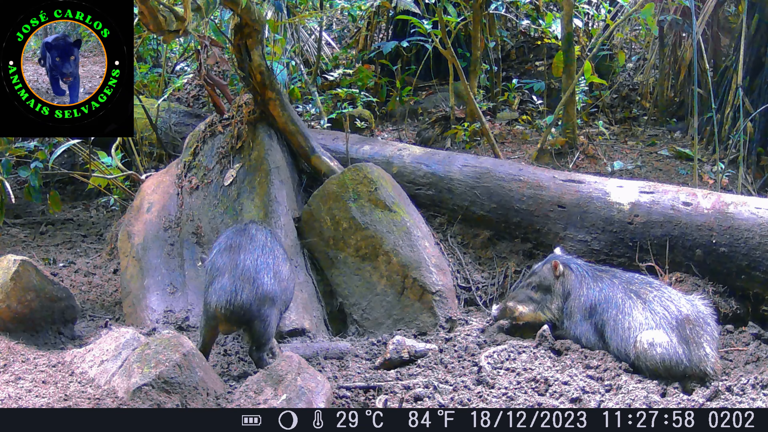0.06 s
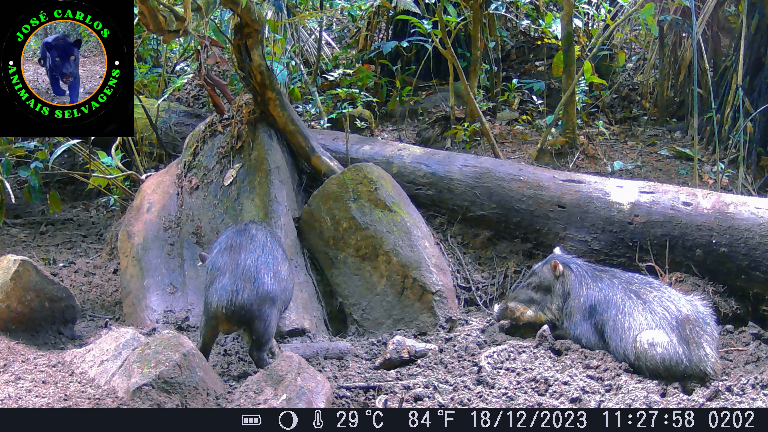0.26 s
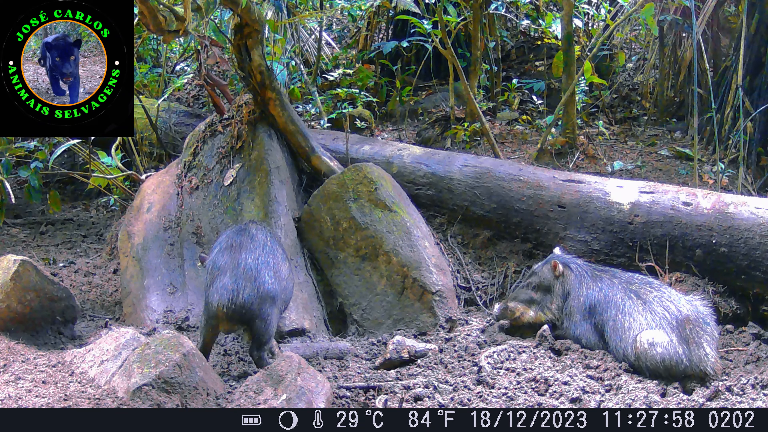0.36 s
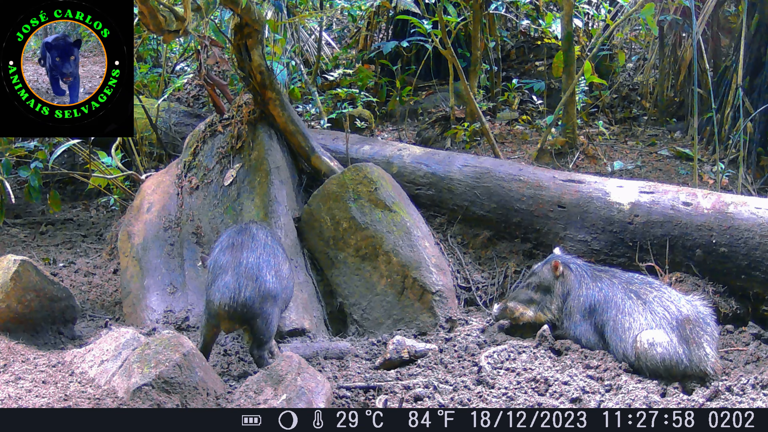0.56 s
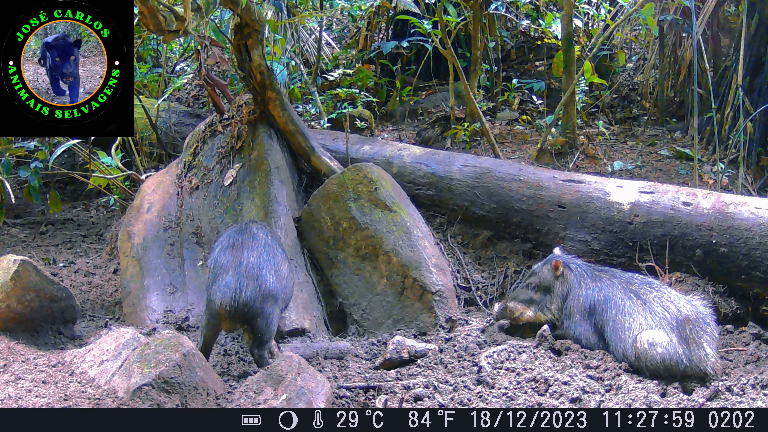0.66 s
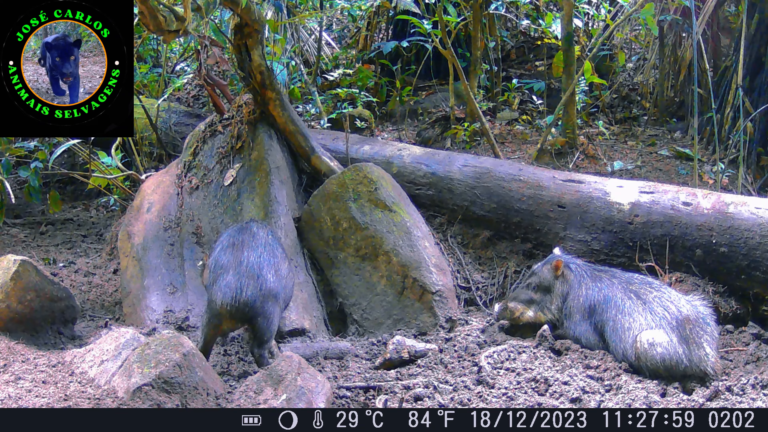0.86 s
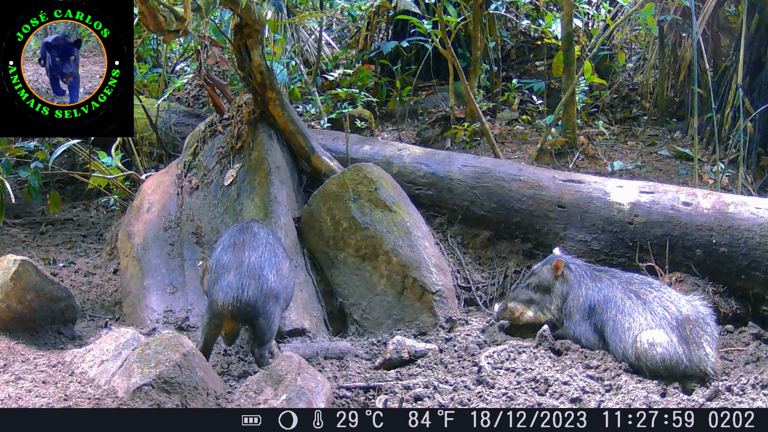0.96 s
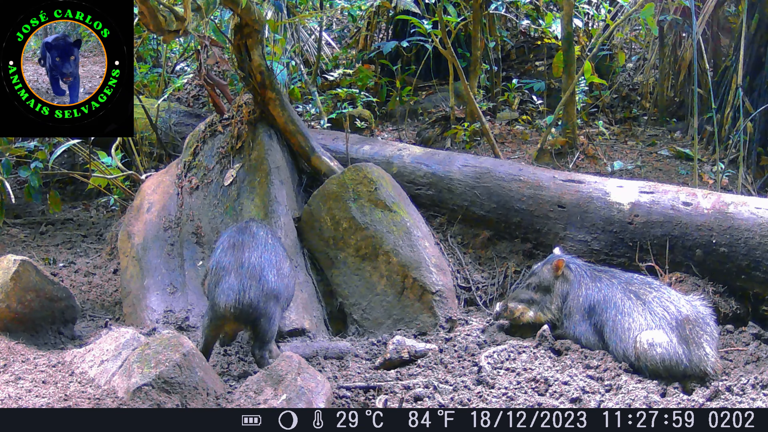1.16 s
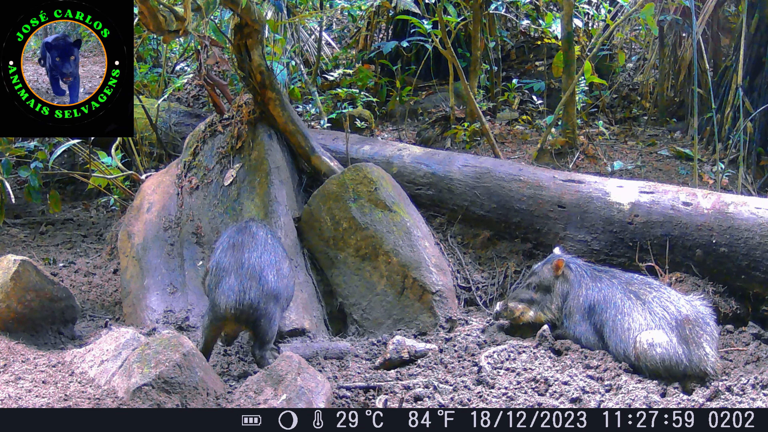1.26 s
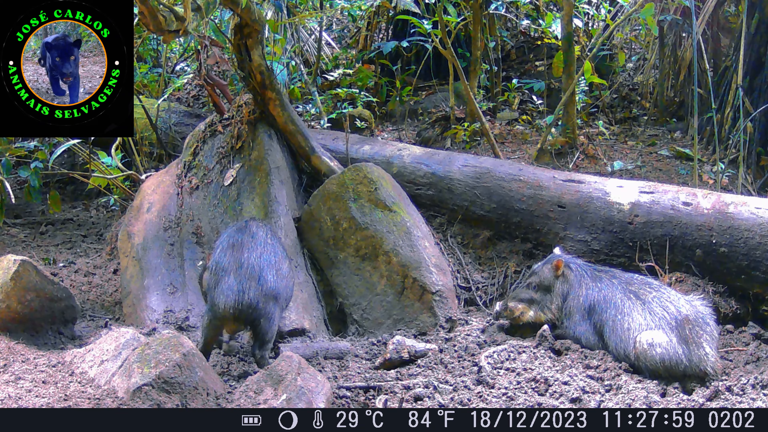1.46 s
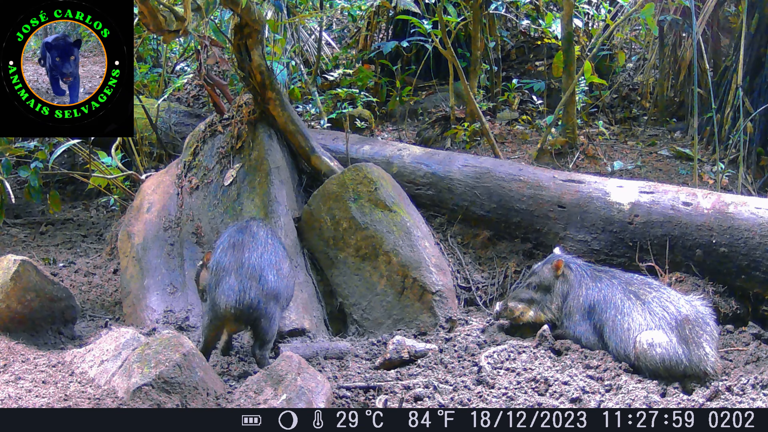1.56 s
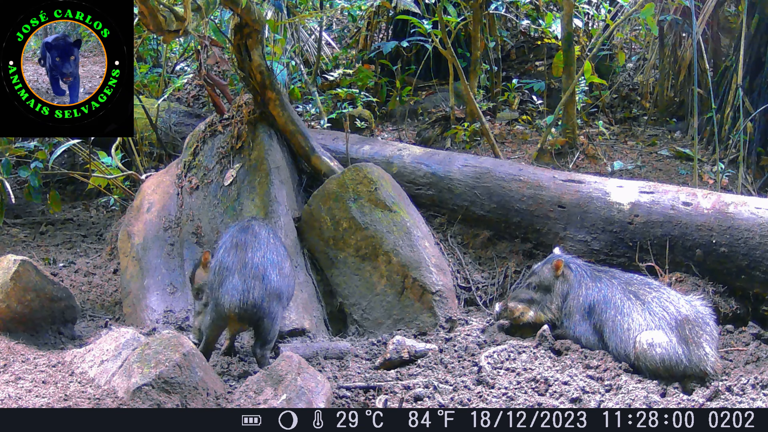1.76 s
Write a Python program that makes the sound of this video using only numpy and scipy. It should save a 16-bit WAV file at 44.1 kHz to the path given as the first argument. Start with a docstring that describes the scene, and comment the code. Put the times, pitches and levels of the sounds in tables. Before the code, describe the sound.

In a quiet forest, a wild pig snaps its teeth with a sharp, hollow double clack that echoes briefly. Afterwards hooves thud softly in soil and chewing ticks lightly, while distant birds whistle and chirp faintly.

```python
"""A forest murmurs, insects hiss and a bright wash of noise dies away. A bird repeats a falling whistle
and hooves thud softly. A peccary (a wild, pig-like animal) at a salt lick clacks its teeth twice:
the teeth crack, the jaw rings, the hollow mouth sounds, and rocks and trees throw the clacks back.
Then a fainter bird chirps above the whistle, and chewing and grit make small ticks."""
import sys
import numpy as np
from scipy import signal
from scipy.fft import rfft, irfft
from scipy.io import wavfile
from scipy.ndimage import uniform_filter1d

SR = 44100
rng = np.random.default_rng(int(sys.argv[2]) if len(sys.argv) > 2 else 0)


def waveform_to_disk(signal):
    """Save audio, clipped to [-1, 1], as 16-bit WAV at the path in sys.argv[1]."""
    frames = np.transpose(np.atleast_2d(signal))
    scaled = np.clip(frames, -1, 1) * 32767
    samples = np.round(scaled).astype(np.int16)
    wavfile.write(sys.argv[1], SR, samples)


N = 79380
T = np.arange(N) / SR
HZ = np.fft.rfftfreq(N, 1 / SR)


def amp(db):
    """Turns decibels into a number to multiply by."""
    return 10 ** (np.asarray(db) / 20)


def unit(x):
    """Scales a signal to an average strength (rms) of 1."""
    return x / np.sqrt(np.mean(x ** 2) + 1e-20)


def read(points, hz):
    """Looks up hz in rows of (frequency, value), sliding between rows on a pitch scale."""
    f, value = np.transpose(points)
    return np.interp(np.log(hz + 1), np.log(f + 1), value)


def add(mix, s, sound):
    """Mixes a sound in, starting at s seconds."""
    part = mix[max(round(s * SR), 0):]
    part += sound[:len(part)]


def tone(hz):
    """A steady, pure note."""
    return np.sin(2 * np.pi * hz * T)


def noise(gain):
    """Noise of strength 1; gain sets the share of each frequency."""
    return unit(irfft(rfft(rng.standard_normal(N)) * gain, N))


def band(hz, octaves):
    """A bell-shaped gain that keeps the frequencies near hz."""
    return np.exp(-.5 * (np.log2((HZ + 1) / hz) / octaves) ** 2)


def drift(hz):
    """A random wobble, up to about hz times a second."""
    return noise(np.exp(-(HZ / hz) ** 2))


def decay(t60, t=T):
    """A fade that drops 60 dB in t60 seconds, the fade time."""
    return np.exp(-np.log(1000) * t / t60)


def forest(x):
    """Countless tiny echoes of x: quick ones off the ground, lasting ones off the trunks."""
    # echoes among the trees: f/Hz, level/dB, fade time/s
    trees = [(150, -19, 0.75), (510, 17, 0.26), (1055, -5, 1), (1670, 5, 0.6), (2390, 1, 0.73),
             (3260, 2.5, 0.64), (4800, -1.5, 0.55), (7400, 6.5, 0.23)]
    trees = np.array(trees)
    hz, t, grains = signal.stft(rng.standard_normal(N), SR, nperseg=256)
    trunk_fade = decay(read(trees[:, [0, 2]], hz)[:, None], t)
    ground_fade = amp(-2) * decay(t60=0.18, t=t)
    colour = amp(read(trees[:, :2], hz))[:, None]
    tail = signal.istft(grains * colour * (trunk_fade + ground_fade), SR, nperseg=256)[1][:N]
    tail *= np.minimum(T / 0.013, 1)  # the echoes take a moment to build
    return signal.fftconvolve(x, tail / np.linalg.norm(tail))[:N]


def murmur():
    """The forest's low noise, slightly louder or softer in random patches of pitch and time."""
    # tone colour of the murmur: f/Hz, relative level/dB
    colour = [(25, 5.5), (60, 3.5), (100, 0.5), (160, -3.5), (280, -6), (500, -8.5), (750, -13),
              (1400, -14.5), (1900, -16.5), (2500, -22), (3300, -26), (4300, -32.5), (5150, -40),
              (5800, -27), (6400, -31.5), (7200, -26.5), (8300, -27), (9100, -51.5)]
    rumble_cut = HZ / np.hypot(HZ, 30)
    grains = signal.stft(noise(amp(read(colour, HZ)) * rumble_cut), nperseg=512)[2]
    patches = uniform_filter1d(rng.standard_normal(grains.shape), size=9, axis=0)
    patch_db = 1.5 * unit(uniform_filter1d(patches, size=8, axis=1))
    return amp(-51.5) * unit(signal.istft(grains * amp(patch_db), nperseg=512)[1][:N])


def insects():
    """Insects make a high, narrow hiss that flutters quickly."""
    flutter = 1 + 0.39 * drift(hz=147)
    return amp(-69.5) * noise(band(hz=7765, octaves=0.055)) * flutter


def wash():
    """A bright wash of noise dies away at the start."""
    # tone colour of the wash: f/Hz, relative level/dB
    colour = [(200, 5.5), (550, -2.5), (1200, -1.5), (3300, -12.5), (4800, -20), (7500, -9), (9000, -32.5)]
    return amp(-47.5) * decay(t60=0.66) * noise(amp(read(colour, HZ)))


def whistling_bird():
    """A pure note slides down, swelling and fading, blurred by the trees."""
    # the whistles: t/s, level/dB
    calls = [(.03, -56), (.61, -54), (1.175, -52.5), (1.715, -50)]
    # tuning of each whistle: pitch ratio
    tunings = [0.979, 0.991, 1.0, 1.025]
    base_hz, fall_hz_per_s, peak_s, length_s = 2413, 2000, .11, .28
    swell = np.interp(T, [0, peak_s, length_s], [0, 1, 0]) ** 0.66
    out = np.zeros(N)
    for (s, db), tune in zip(calls, tunings):
        hz = tune * base_hz - fall_hz_per_s * np.minimum(T, length_s) + 5 * drift(hz=60)
        add(out, s, amp(db) * swell * np.sin(2 * np.pi * np.cumsum(hz) / SR))
    return out + amp(-1) * forest(out)


def hoof_thuds():
    """Hooves and snouts push into soft soil: a low, fading note with a noisy scuff."""
    # the thuds: t/s, level/dB, f/Hz, fade time/s
    thuds = [(0.062, -44, 112, 0.084), (0.073, -39, 220, 0.061), (0.087, -42, 88, 0.14),
             (0.095, -37.5, 214, 0.062), (.42, -50.5, 449, 0.43), (0.48, -34, 377, 0.032),
             (0.493, -32.5, 367, 0.032), (0.509, -39, 418, 0.034), (0.529, -41, 162, 0.037),
             (.732, -40.5, 511, 0.094), (0.753, -34.5, 376.5, 0.035), (0.768, -37, 269, 0.045),
             (0.784, -45, 365, 0.055), (.8, -46.5, 129, 0.135), (1.202, -40, 80.5, 0.24),
             (1.212, -39, 250, 0.039), (1.47, -40.5, 82.5, 0.17), (1.488, -49.5, 140, .07),
             (1.699, -40, 93.8, 0.24), (1.722, -31.5, 274, 0.022)]
    rise = np.minimum(T / .002, 1)
    out = np.zeros(N)
    for s, db, hz, t60 in thuds:
        scuff = amp(-4.5) * noise(band(hz, octaves=0.5))
        add(out, s, amp(db) * rise * decay(t60) * (tone(hz) + scuff))
    return out


def tooth_clack(mouth_hz, mouth_db, mouth_s, tilt_db, tune):
    """Teeth crack together, the jaws ring and bump, and the hollow of the closing mouth sounds."""
    # ringing notes of teeth and jaw: f/Hz, level/dB, fade time/s
    jaw_notes = [(1085, -12, .03), (1410, -21, 0.051), (1894, -20, 0.023), (2093, -12, 0.019),
                 (2275, -9, 0.032), (2492, -17, 0.057), (3120, -12, 0.017), (3496, -12, .028),
                 (3830, -22, 0.049), (4080, -24, 0.036), (4810, -28, 0.026), (5880, -17, 0.011),
                 (6810, -25.5, 0.015), (7450, -28, 0.012)]
    # tone colour of the crack: f/Hz, relative level/dB
    crack_colour = [(60, -27), (250, -3.5), (500, -3), (750, -4), (1000, -2), (1700, -9.5), (2300, -10.5),
                    (3700, -20), (4400, -20.5), (5800, -19), (7900, -17), (8600, -32.5), (9500, -48),
                    (15000, -50)]
    jaw = np.zeros(N)
    for k, (hz, db, t60) in enumerate(jaw_notes):
        gain = (-1) ** k * amp(db + np.interp(hz, HZ, tilt_db))  # every other note is flipped
        jaw += gain * decay(t60) * tone(tune * hz)
    crack = amp(-11) * decay(t60=0.029) * noise(amp(read(crack_colour, HZ) + tilt_db))
    teeth_rise = 1 - np.exp(-T / 0.00083)
    mouth_rise = 1 - np.exp(-T / .002)
    mouth_shut = np.exp(-(T / mouth_s) ** 3.6)
    mouth = amp(mouth_db) * mouth_rise * mouth_shut * tone(mouth_hz)
    bump = amp(-25.5) * decay(t60=.03) * tone(235)
    return (jaw + crack) * teeth_rise + mouth + bump


def peccary():
    """Two clacks of the teeth; rocks and a log send back dull copies, and the trees ring on."""
    # the clacks: t/s, level/dB, mouth f/Hz, mouth level/dB, mouth ring time/s,
    # treble tilt/(dB per octave squared), forest level/dB, nearest rock's echo/dB, jaw pitch ratio
    clacks = [(0.1182, -9.5, 519, -1.5, 0.012, -3, -17, -9.5, .965),
              (0.1698, 0.5, 549, -3, 0.012, 0, -11, -19.5, 1.005)]
    # echoes off the log and stones: delay/s, level/dB
    echoes = [(0.0145, -30.5), (0.023, -20.5)]
    # the short burst a clack throws into the trees: f/Hz, relative level/dB
    burst_colour = [(100, -12), (350, -5.5), (450, -2), (515, 6), (620, -1.5), (850, -11.5), (1100, 9),
                    (1700, -5.5), (2250, 10), (2800, 4.5), (3600, 7.5), (4400, -4), (5100, -10),
                    (5800, -5.5), (8000, -10.5), (9500, -26.5)]
    rock_delay_s, burst_delay_s = 0.014, 0.0027
    treble_octaves = np.log2(np.maximum(HZ / 2000, 1))
    out = np.zeros(N)
    for s, db, mouth_hz, mouth_db, mouth_s, tilt, forest_db, rock_db, tune in clacks:
        tilt_db = tilt * treble_octaves ** 2
        clack = amp(db) * tooth_clack(mouth_hz, mouth_db, mouth_s, tilt_db, tune)
        burst = irfft(amp(db + 13 + read(burst_colour, HZ) + tilt_db), N)
        burst = np.roll(burst, round(burst_delay_s * SR)) * (T < 2 * burst_delay_s)
        add(out, s, clack + amp(forest_db) * forest(burst + amp(-27) * clack))
        dull = signal.lfilter(*signal.butter(1, 2200, fs=SR), clack)
        for delay, echo_db in [(rock_delay_s, rock_db)] + echoes:
            add(out, s + delay, amp(echo_db) * dull)
    return out


def raspy(cycles, blur_hz=230):
    """A note roughened by fast random wobbles; cycles counts its vibrations so far."""
    phase = 2 * np.pi * cycles
    return (drift(blur_hz) * np.sin(phase) + drift(blur_hz) * np.cos(phase)) / 2


def chirping_bird():
    """A far bird's raspy rising chirp, with a fainter, higher note just behind it."""
    # the chirps: t/s, relative level/dB
    chirps = [(0.399, -66.5), (0.658, -67.5), (0.951, -69.5), (1.229, -66), (1.519, -66)]
    start_hz, rise_hz_per_s, peak_s, length_s = 4394, 1800, 0.029, 0.24
    top_hz, top_db, top_delay_s = 5700, -4.5, 0.047
    swell = np.sqrt(np.interp(T, [0, peak_s, length_s], [0, 1, 0]))
    cycles = np.cumsum(start_hz + rise_hz_per_s * np.minimum(T, length_s)) / SR
    out = np.zeros(N)
    for s, db in chirps:
        add(out, s, amp(db) * swell * raspy(cycles))
        add(out, s + top_delay_s, amp(db + top_db) * swell * raspy(top_hz * T))
    return out


def chewing_ticks():
    """Chewing makes short, hollow ticks, each with a noisy spray of grit."""
    # the ticks: t/s, relative level/dB, f/Hz, grit level/dB, grit f/Hz
    ticks = [(0.54, -48, 1400, 2.5, 1500), (0.603, -42, 1493, -10, 1406), (0.6482, -41, 1060, -1, 1990),
             (0.666, -43, 1230, -9, 3230), (.7416, -42, 1280, -9, 1310), (1.0879, -44, 1960, -10, 2080),
             (1.1145, -39.5, 1690, -6, 1620), (1.1322, -49, 1920, -12, 2360),
             (1.1541, -39, 1640, -13, 1900), (1.19, -30.5, 1018, -5.5, 1540),
             (1.1906, -32, 1715, -8.5, 1700), (1.651, -51, 3250, 2, 2400), (1.7015, -41, 1405, -6.5, 2880),
             (1.7336, -37, 970, -2, 1700), (1.754, -44, 1730, 0.5, 1490)]
    rise_s, length_s = 0.00049, 0.0062
    shape = np.minimum(T / rise_s, 1) * np.exp(-(T / length_s) ** 2) / 2
    out = np.zeros(N)
    for s, db, hz, grit_db, grit_hz in ticks:
        grit = amp(grit_db) * noise(band(grit_hz, octaves=0.36))
        add(out, s, amp(db) * shape * (tone(hz) + grit))
    return out


def scene():
    """Adds all the sounds into one channel; thuds and ticks echo faintly in the trees."""
    background = murmur() + insects() + wash()
    birds = whistling_bird() + chirping_bird()
    ground = hoof_thuds() + chewing_ticks()
    return (background + birds + ground + amp(-14) * forest(ground) + peccary())[None]


def record(dry):
    """A microphone that loses the highest treble, flattens very loud peaks and adds a faint hiss."""
    mic_top_hz, peak_limit, hiss_db, final_top_hz = 8600, .95, -85, 15700
    dulled = signal.oaconvolve(dry, signal.firwin(121, mic_top_hz, fs=SR)[None], "same")
    hissy = np.clip(dulled, -peak_limit, peak_limit) + amp(hiss_db) * rng.standard_normal(N)
    treble_cut = signal.firwin(511, final_top_hz, window=("kaiser", 9), fs=SR)
    return signal.oaconvolve(hissy, treble_cut[None], "same")


dry = scene()
out = record(dry)
waveform_to_disk(out)
```